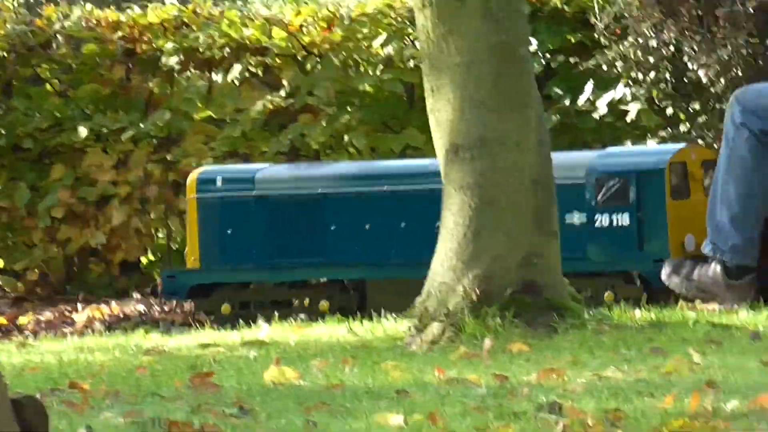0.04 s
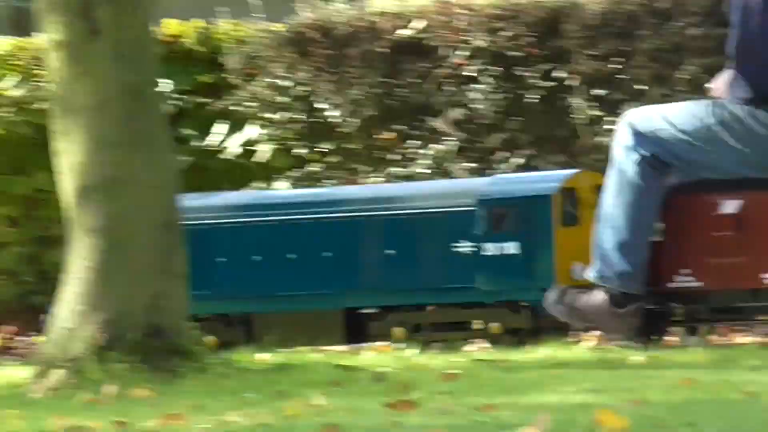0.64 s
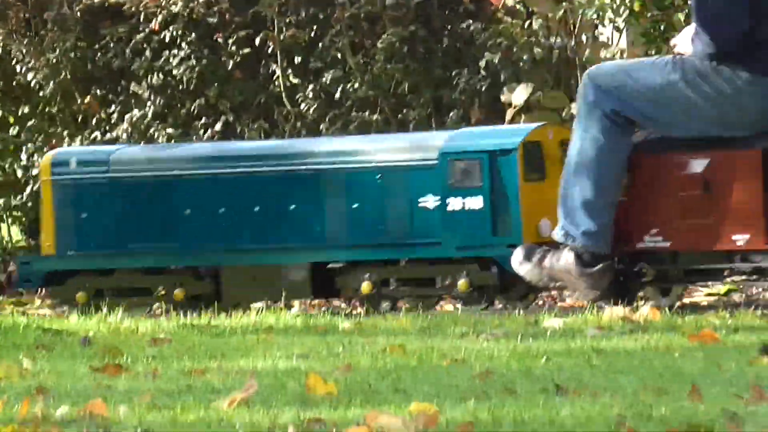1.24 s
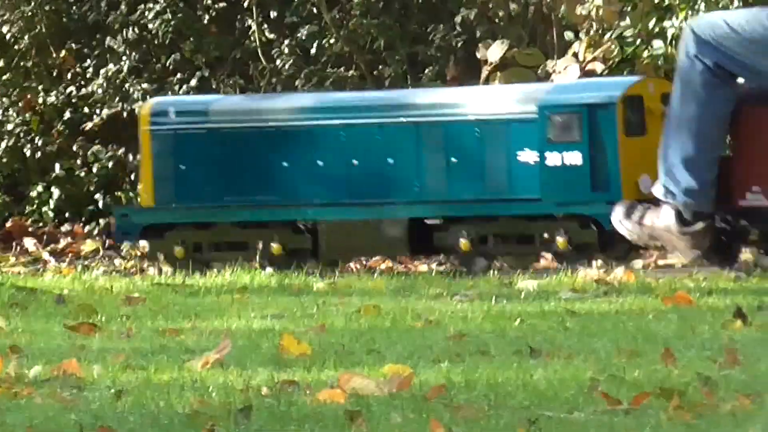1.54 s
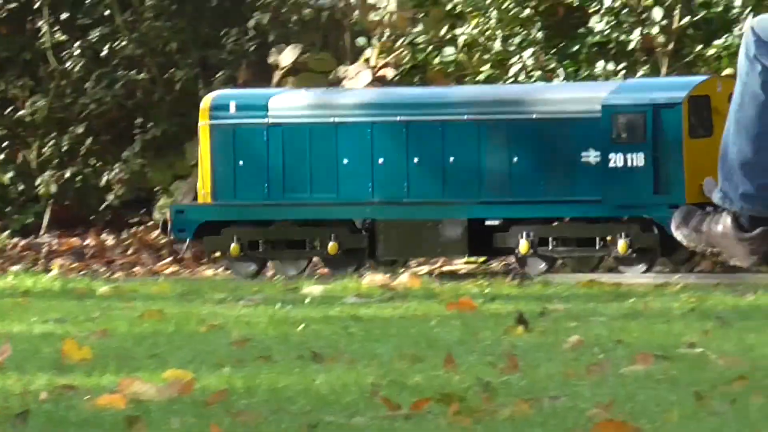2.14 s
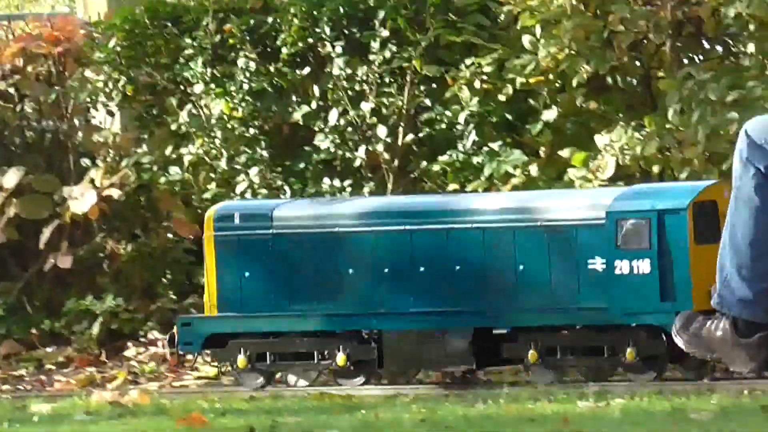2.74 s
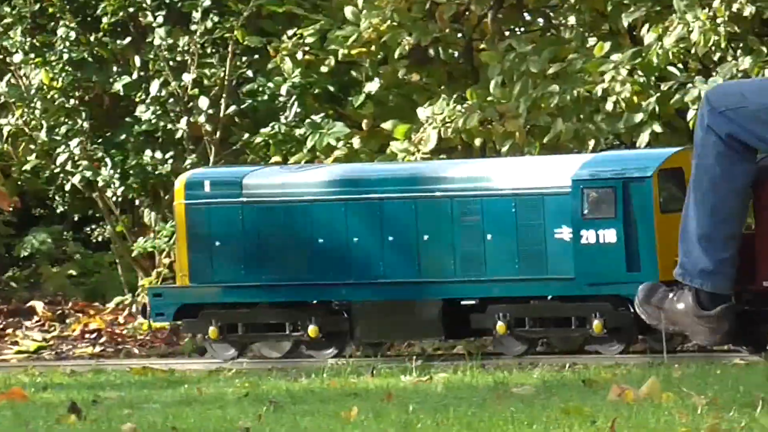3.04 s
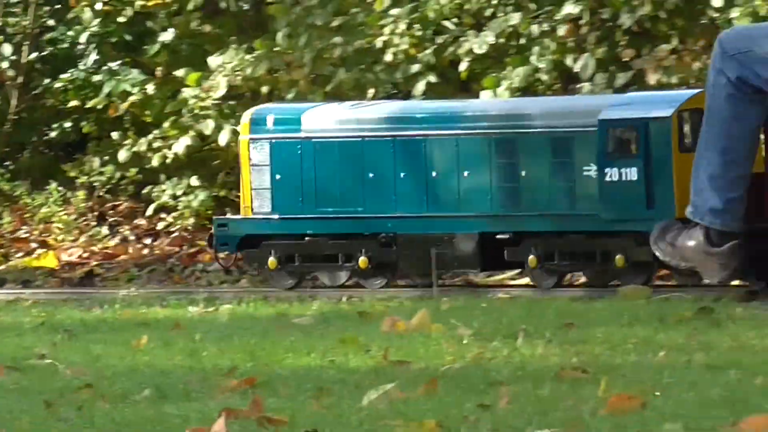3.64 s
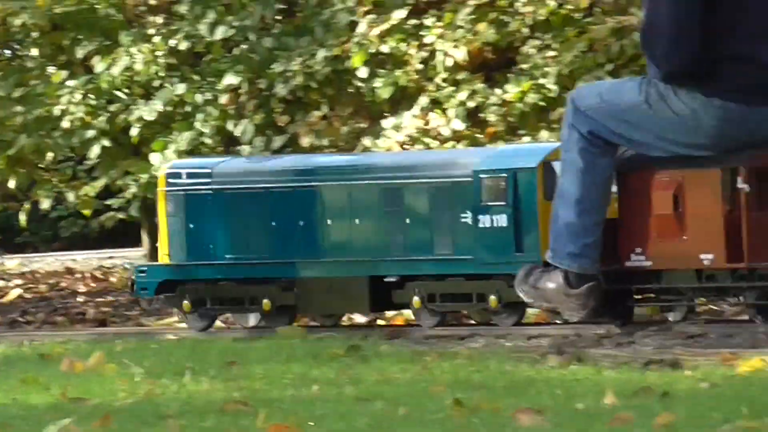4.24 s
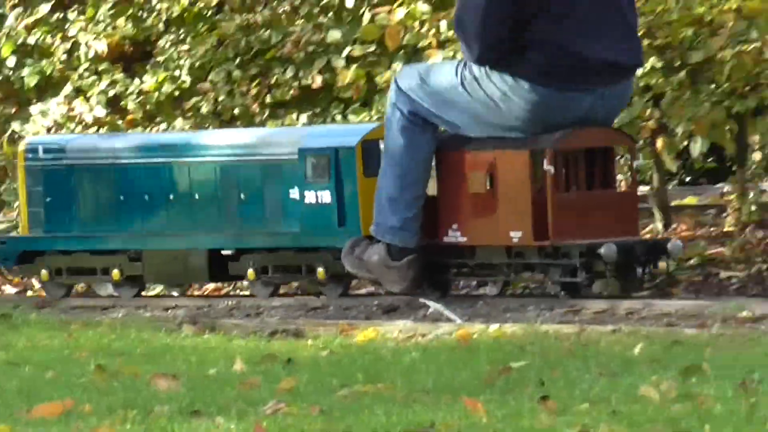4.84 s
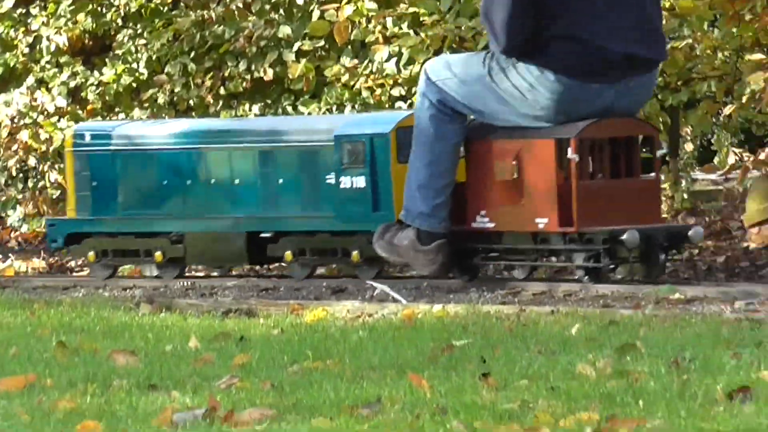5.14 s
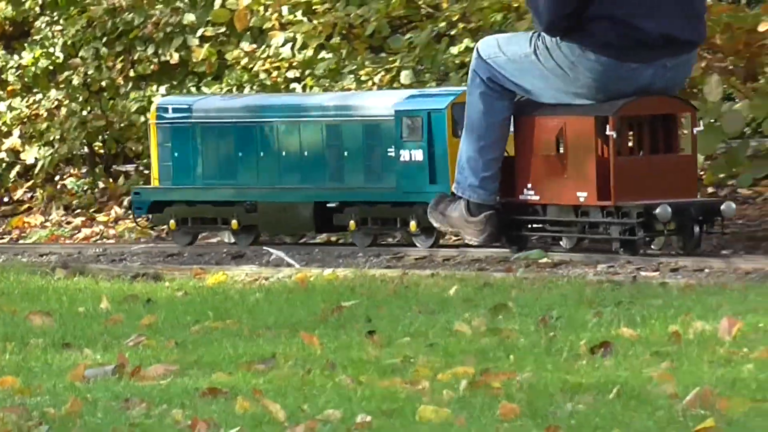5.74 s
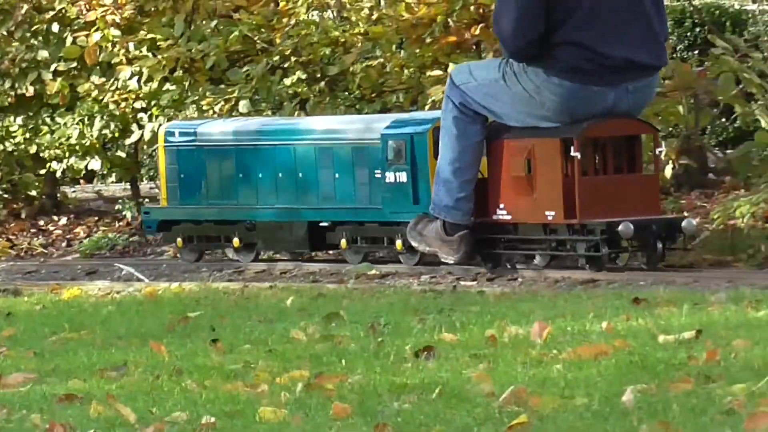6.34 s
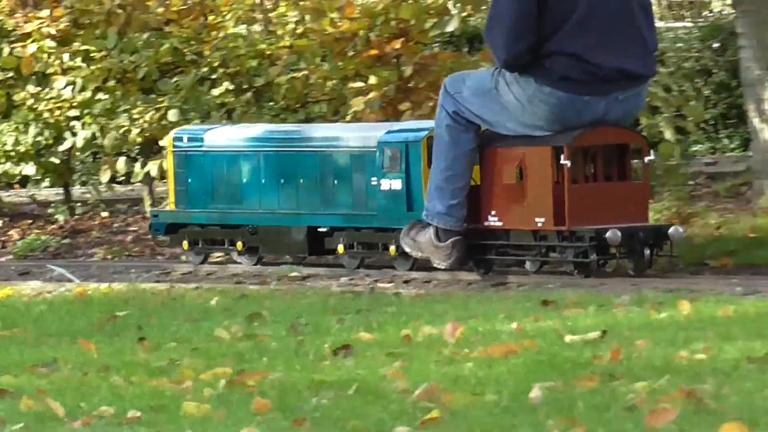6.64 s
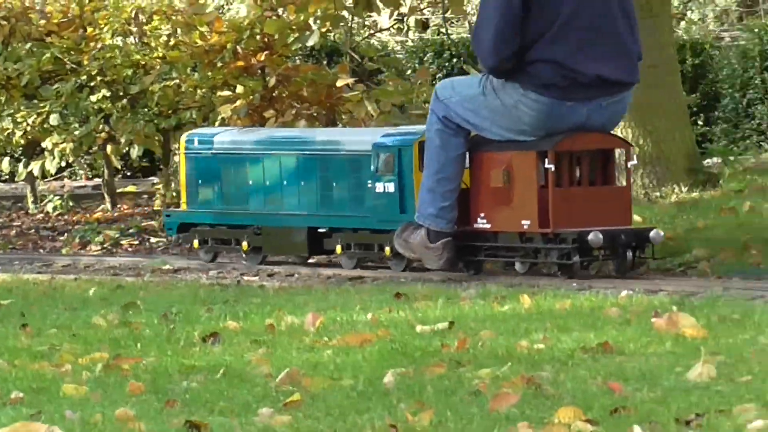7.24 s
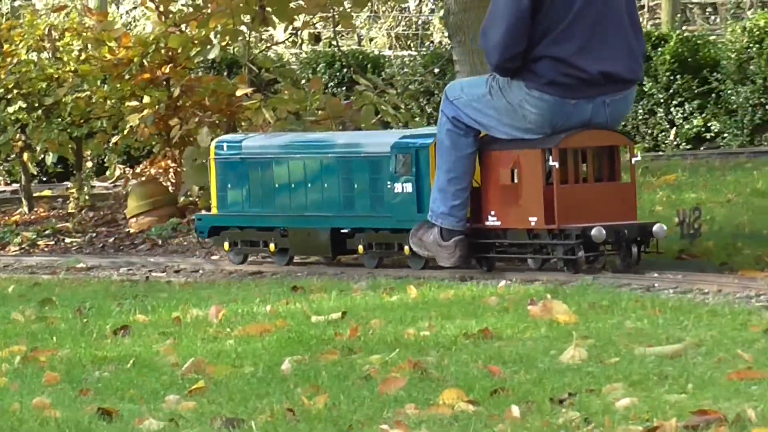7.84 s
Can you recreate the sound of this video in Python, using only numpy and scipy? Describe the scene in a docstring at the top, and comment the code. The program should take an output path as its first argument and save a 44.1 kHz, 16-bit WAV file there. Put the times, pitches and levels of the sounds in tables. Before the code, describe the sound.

In a quiet open garden, a small ride-on diesel train approaches, passes the microphone and heads away. A low, throbbing engine drone with a rapid metallic chuffing runs throughout, dropping slightly in pitch and gaining rasp after it goes by. Steel wheels rumble steadily along the track, now and then rubbing, ticking and giving tiny squeaks over a soft outdoor hush.

```python
"""A miniature diesel locomotive with a rider passes along a garden railway, easing off a little.
A looped diesel-engine sound, probably from its loudspeaker, booms, growls and rasps, repeating every
nine beats, with a bright metallic chuff on each. The tone shifts as we hear its front, side, then rear.
The wheels rumble on rough rails, scrape with their rims, tick, and squeak when they stick.
The open garden adds only a soft hush."""
import sys
import numpy as np
from scipy import signal
from scipy.fft import rfft, irfft
from scipy.io import wavfile
from scipy.ndimage import uniform_filter1d, map_coordinates

SR = 44100
rng = np.random.default_rng(int(sys.argv[2]) if len(sys.argv) > 2 else 0)


def store_wav(level_fs):
    """Save 16-bit WAV to argv[1]."""
    pcm = np.round(np.clip(np.atleast_2d(level_fs), -1, 1) * 32767)
    wavfile.write(sys.argv[1], SR, pcm.T.astype(np.int16))


N = 356328
TIME = np.arange(N) / SR
FREQS = np.fft.rfftfreq(N, 1 / SR) + 1e-3
BEATS_PER_LOOP = 9


def undb(db):
    """Turn decibels into a number to multiply by."""
    return 10 ** (np.asarray(db) / 20)


def unit(x):
    """Scale a sound to an average strength (rms) of 1."""
    return x / np.sqrt(np.mean(x ** 2))


def colour(points, at=FREQS):
    """Join (frequency, dB) points into a filter curve."""
    where, db = np.transpose(points)
    return undb(np.interp(np.log(at), np.log(where), db))


def resonance(hz, width):
    """The filter curve of something that rings at one pitch."""
    return 1 / (1 + 1j * (FREQS / hz - hz / FREQS) * hz / width)


def shape(x, response):
    """Pass a sound through a filter curve."""
    return irfft(rfft(x) * response, N)


def ring(x, modes):
    """Make a sound ring at several pitches."""
    return unit(shape(x, sum(undb(db) * resonance(hz, width) for hz, width, db in modes)))


def band(x, lo_hz, hi_hz):
    """Keep what lies between two frequencies."""
    return shape(x, 1 / (1 + (lo_hz / FREQS) ** 20) / (1 + (FREQS / hi_hz) ** 20))


def noise(side):
    """Stereo hiss; the larger side is, the less the two ears share."""
    mid, apart = rng.standard_normal((2, N))
    return np.array([mid + side * apart, mid - side * apart])


def pan(x, left_db):
    """Lean a sound to the left, or to the right if left_db is negative."""
    return x * undb(np.array([[left_db], [-left_db]]) / 2)


def walk(rate):
    """A smooth random wobble of size about 1 that changes about rate times a second."""
    return map_coordinates(rng.standard_normal(4096), [TIME * rate], order=2, mode="wrap")


def swell(start, length):
    """A rounded rise and fall."""
    return np.sqrt(np.maximum(np.sin(np.pi * np.clip((TIME - start) / length, 0, 1)), 0))


# How fast the engine sound beats: t/s, beat rate/Hz
BEAT_RATE = [(0.0, 39.49), (1.0, 39.39), (2.2, 39.49), (3.0, 38.84), (4.0, 37.75), (5.0, 36.73),
             (5.7, 36.06), (6.3, 36.41), (7.2, 36.92), (8.08, 36.84)]


def beat_rate():
    """Beats per second at every moment."""
    return np.interp(TIME, *np.transpose(BEAT_RATE))


def passing(front_db, side_db, rear_db, throttle_db=0):
    """How loud a part is as the locomotive goes by; throttle_db is per extra beat a second of throttle."""
    side_on_s, turn_45_degrees_s = 3.8, 1.3
    cruise_hz, lead_s = 38.17, .4
    angle = np.arctan((TIME - side_on_s) / turn_45_degrees_s)
    facing_db = np.interp(angle, [-np.pi / 2, 0, np.pi / 2], [front_db, side_db, rear_db])
    speed = beat_rate()
    acceleration = uniform_filter1d(np.gradient(speed) * SR, SR // 2)
    throttle = speed - cruise_hz + lead_s * acceleration  # the throttle moves before the speed does
    return undb(facing_db + throttle_db * throttle)


# The loop's strong tones: f/multiples of the loop rate, relative level/dB
STRONG_TONES = [(26, -40.2), (27, -40.4), (29, -39.3), (31, -33.8), (32, -37.2), (33, -23.3), (34, -39.0),
                (35, -30.2), (36, -40.1), (38, -37.6), (41, -31.1), (42, -22.7), (43, -30.9), (44, -32.2),
                (46, -35.5), (47, -38.9), (49, -33.0), (55, -40.0), (60, -39.3), (61, -40.8), (65, -40.1),
                (66, -39.0), (68, -34.6), (69, -33.0), (70, -34.1), (71, -38.0), (75, -38.1), (78, -43.8),
                (83, -47.3), (119, -43.5)]
# The outline of the weak tones between them: f/multiples of the loop rate, relative level/dB
WEAK_TONES = [(10, -90), (18, -61), (24, -52), (30, -45), (38, -42), (52, -41), (58, -47), (73, -46),
              (84, -52), (100, -55), (116, -53), (135, -58), (165, -65), (220, -80)]
# How far the loop dips between beats, one value a beat: relative depth/0 to 1
BEAT_DIPS = [.95, .9, .65, .85, .95, .7, .65, .6, 1]


def one_loop(lo, hi, dip, dip_at, rounds, size=4096):
    """One turn of the loop's tones from multiple lo to hi, bunched into nine throbs."""
    multiples = np.arange(size // 2 + 1)
    gain = colour(WEAK_TONES, np.maximum(multiples, 1))
    for multiple, db in STRONG_TONES:
        gain[round(multiple)] = undb(db)
    gain *= (multiples >= lo) * (multiples < hi)
    beat = np.arange(size) / size * BEATS_PER_LOOP - dip_at
    depth = dip * np.interp(beat, np.arange(BEATS_PER_LOOP), BEAT_DIPS, period=BEATS_PER_LOOP)
    throb = 1 - np.minimum(depth, 1) * np.cos(np.pi * beat) ** 4
    wave = rng.standard_normal(size)
    for _ in range(rounds):  # more rounds make the throbs more even
        loudness = np.abs(signal.hilbert(wave))
        slow_power = uniform_filter1d(loudness ** 2, size // 4, mode="wrap")
        wave = wave * np.sqrt(throb / loudness / slow_power)  # nudge it towards the throb
        wave = irfft(gain * np.exp(1j * np.angle(rfft(wave))))  # give each tone its level back
    return unit(wave)


# Where the rasp rings: f/Hz, width/Hz, relative level/dB
RASP_RINGS = [(602, 58, -5), (655.5, 39, 0.5), (713, 33, -2), (1102, 36, -2), (1560, 180, -12.5)]


def engine_loop(beats, flutter_beats=0.0063, waver_db=1.54, spread=.1):
    """A looped diesel-engine sound, probably from the model's loudspeaker, booms, growls and rasps."""
    position = (beats + flutter_beats * walk(25)) / BEATS_PER_LOOP % 1
    loops = [one_loop(10, 56, dip=1.05, dip_at=.09, rounds=40),
             one_loop(56, 88, dip=.9, dip_at=.4, rounds=3),
             one_loop(88, 134, dip=.35, dip_at=.09, rounds=50),
             one_loop(134, 220, dip=.4, dip_at=.09, rounds=40)]
    boom, hum, growl, buzz = (np.interp(position, np.linspace(0, 1, len(w) + 1), np.append(w, w[0]))
                              for w in loops)
    upper_boom = band(boom, 155, 400)
    deep_boom = unit(boom - upper_boom) * passing(-24, -21.5, -19.5, throttle_db=1.8)
    upper_boom = unit(upper_boom) * passing(-26, -19.5, -17, throttle_db=1.3)
    hum = hum * passing(-31.5, -23, -22.5, throttle_db=3)
    growl = unit(shape(growl, resonance(hz=485, width=90))) * passing(-46.5, -40.5, -36, throttle_db=-.8)
    hiss = unit(band(rng.standard_normal(N), 440, 2000))
    rasp = ring(0.67 * buzz + hiss, RASP_RINGS) * passing(-61.5, -52, -40, throttle_db=.54)
    low = deep_boom + upper_boom + hum * undb(waver_db * walk(30))
    high = (growl + rasp) * undb(waver_db * walk(30))
    side = spread * shape(low + high, 1j)  # one ear hears it slightly sooner
    return low + pan(high, left_db=-4) + np.array([side, -side])


# How strong each of the nine chuffs is: extra level/dB
CHUFF_ACCENTS = [-1.5, -0.5, -1.5, -4.5, 1.5, -2, -0.5, -7, 2.5]
# The tone of a chuff's hiss: f/Hz, relative level/dB
CHUFF_TONE = [(1500, -25.5), (2500, 3.5), (3100, -4.5), (3800, 3), (7900, 4), (8400, -12), (10000, -18),
              (15000, -29)]
# Where a chuff rings, heard from the front: f/Hz, width/Hz, relative level/dB
FRONT_RINGS = [(3810, 120, -8.5), (4613, 110, 3), (5100, 100, -5), (5330, 110, 2), (5670, 220, -4),
               (6150, 220, -0.5), (6560, 120, -4), (6734, 170, 5.5), (7000, 180, -7.5), (7340, 150, -8)]
# Where it rings, heard from the rear: f/Hz, width/Hz, relative level/dB
REAR_RINGS = [(2608, 32, -7), (2804, 84, -5.5), (3474, 130, -7), (3840, 120, -9), (4120, 25, -5.5),
              (4530, 81, -7.5), (4770, 180, -1), (5260, 240, -5), (5700, 59, -8), (6000, 160, -9.5),
              (7030, 700, -11.5), (7260, 130, -10.5), (7650, 200, -1.5), (9000, 910, -8.5)]


def chuffs(beats, peak_at=0.91, skew=0.15, depth_db=8):
    """A gritty burst on every beat, quick to rise and slower to fade, with a bright metallic ring."""
    phase = beats - peak_at
    accent_db = np.interp(phase, np.arange(BEATS_PER_LOOP), CHUFF_ACCENTS, period=BEATS_PER_LOOP)
    burst = np.cos(np.pi * (phase + skew * np.cos(np.pi * phase) ** 2)) ** 2
    grit_db = .5 * walk(45) + np.repeat(rng.standard_normal(N // 32 + 1), 32)[:N]
    loudness = undb(burst * (depth_db + accent_db) + grit_db)
    rattle = shape(noise(side=0.14) * loudness, colour(CHUFF_TONE))
    treble = band(rattle, 6000, 20000)
    brightness = undb(1.3 * walk(90))  # no two bursts are equally bright
    rattle = treble * brightness + (rattle - treble) / brightness
    front = ring(rattle, FRONT_RINGS) * passing(-53.5, -45.5, -62.5, throttle_db=1.6)
    rear = ring(rattle, REAR_RINGS) * passing(-67, -52, -42.5, throttle_db=.32)
    return pan(front + rear, left_db=-1.5)


# The tone of the rolling wheels: f/Hz, relative level/dB
RUMBLE_TONE = [(25, -22.5), (50, -9.5), (66, 11), (85, 11.5), (140, 20.5), (300, 17), (390, 13), (600, 4.5),
               (780, -3), (980, -2.5), (1120, 0), (1300, -7), (1700, -5.5), (3000, -25), (9000, -36)]


def wheel_rumble(uneven_db=1.0, bass_blend=.25):
    """Steel wheels rumble over slightly rough rails."""
    rumble = shape(noise(side=0.37) * undb(uneven_db * walk(35)), colour(RUMBLE_TONE))
    bass = band(rumble, 10, 600)
    rumble += bass_blend * (bass.mean(axis=0) - bass)  # the bass is more alike in both ears
    rumble /= np.std(band(rumble, 800, 1500))  # the middle pitches set the level
    return rumble * passing(-51.5, -50, -50)


# The tone of the garden's hush: f/Hz, relative level/dB
GARDEN_TONE = [(25, -2.5), (200, -2), (1000, -12.5), (3000, -11), (8000, -15), (11000, -23.5),
               (15500, -33.5)]


def garden(level_db=-57, breeze_db=2.5):
    """A soft outdoor hush rises and falls with the breeze."""
    hush = unit(shape(noise(side=0.29), colour(GARDEN_TONE)))
    return hush * undb(level_db + breeze_db * walk(1.6))


# When the wheel rims rub: t/s, length/s, level/dB
RIM_RUBS = [(-.1, 0.71, -54), (1.115, 0.46, -48.5), (1.835, 0.53, -51), (2.7, 0.9, -55), (3.707, 0.5, -51),
            (4.6, .4, -57.5), (5.362, 0.48, -52), (7.02, 0.56, -57)]


def wheel_scrapes(ring_hz=1923, judder_db=2.0):
    """The rims that keep the wheels on the track rub the rail and make the wheels ring."""
    rub = noise(side=0.82) * undb(judder_db * walk(70))
    ringing = unit(shape(rub, resonance(ring_hz, width=470) ** 2))
    loudness = sum(swell(start, length) * undb(db) for start, length, db in RIM_RUBS)
    return pan(ringing * loudness, left_db=12)


# Each tick: t/s, relative level/dB, fade time/s, level of its knock against the tick/dB
TRACK_TICKS = [(.58, -48, 0.016, 3), (2.2, -51, .012, -10), (2.985, -43, .002, -13),
               (4.458, -49, 0.0045, -13), (4.803, -36.5, 0.0089, -2), (5.021, -47, .008, -6),
               (5.357, -41, .003, -13), (5.475, -53.5, .015, 17), (6.804, -32.5, 0.0015, -1),
               (7.042, -46, 0.0036, 14.5), (7.549, -43, 0.0025, -1), (7.601, -45, 0.016, 5)]
# The tone of a tick's crack: f/Hz, relative level/dB
CRACK_TONE = [(1500, -15), (4500, 1), (8500, 3.5), (10500, -11), (12500, -10.5), (14000, -15.5),
              (15500, -18.5)]


def track_ticks(knock_hz=1500, gain_db=3, tail_db=-17, tail_s=.02):
    """Wheels and track give bright cracks with a faint rustling tail, some over a duller knock."""
    crack_level, knock_level = np.zeros((2, N))
    for start, db, fade_s, knock_db in TRACK_TICKS:
        age = np.abs(TIME - start)
        strength = (TIME >= start) * undb(db + gain_db)
        fade = strength * (np.exp(-age / fade_s) + undb(tail_db) * np.exp(-age / tail_s))
        crack_level += fade
        knock_level += fade * undb(knock_db)
    cracks = shape(noise(side=.4) * crack_level, colour(CRACK_TONE))
    knocks = shape(noise(side=.4) * knock_level, resonance(knock_hz, width=2600) ** 2)
    return cracks + knocks


# Each squeak: t/s, length/s, starting f/Hz, relative level/dB
WHEEL_SQUEAKS = [(1.135, 0.038, 4400, -52), (1.269, 0.086, 3910, -46), (1.625, .09, 3890, -50),
                 (2.247, 0.024, 3660, -45), (3.82, 0.085, 3980, -47.5), (4.002, 0.12, 3900, -53),
                 (6.684, .08, 3900, -49), (6.87, 0.059, 4410, -45)]


def wheel_squeaks(sag_hz_per_s=900, gain_db=-1.0):
    """Now and then a wheel sticks and sings roughly for a moment, sagging in pitch."""
    wobble_hz, judder_db = 28 * walk(300), 3 * walk(150)
    squeaks = np.zeros(N)
    for start, length, start_hz, db in WHEEL_SQUEAKS:
        hz = start_hz - sag_hz_per_s * np.clip(TIME - start, 0, length) + wobble_hz
        tone = np.sin(2 * np.pi * np.cumsum(hz) / SR)
        squeaks += tone * swell(start, length) ** 2 * undb(db + gain_db)
    return squeaks * undb(judder_db)


def scene():
    """Engine sound and wheels in the garden; loop and chuffs follow the same count of beats."""
    beats = np.cumsum(beat_rate()) / SR
    engine_sound = engine_loop(beats) + chuffs(beats)
    return engine_sound + wheel_rumble() + garden() + wheel_scrapes() + track_ticks() + wheel_squeaks()


def record(dry):
    """Cut away the very highest treble."""
    top_hz = 15700
    return signal.sosfilt(signal.ellip(8, .2, 70, top_hz, fs=SR, output="sos"), dry)


dry = scene()
out = record(dry)
store_wav(out)
```